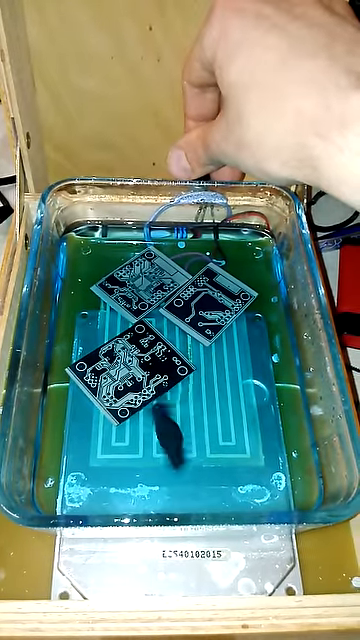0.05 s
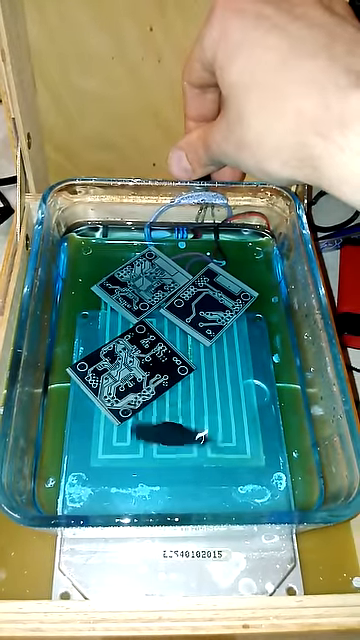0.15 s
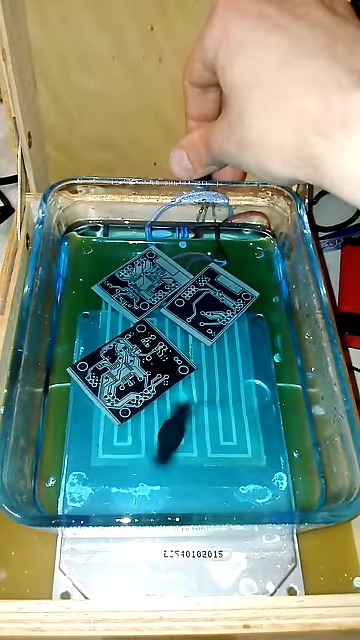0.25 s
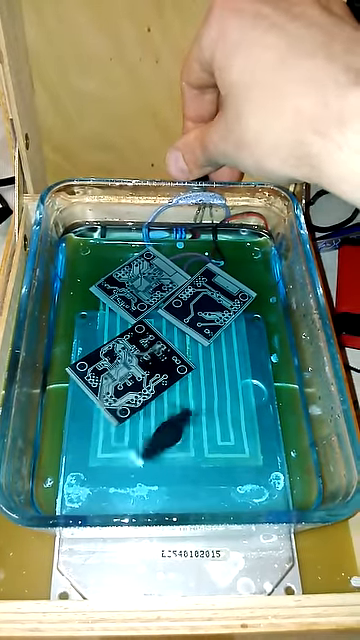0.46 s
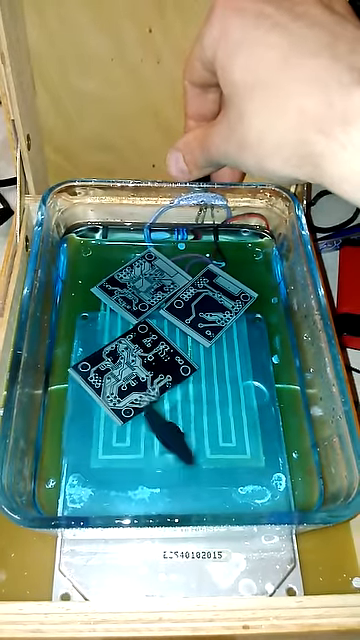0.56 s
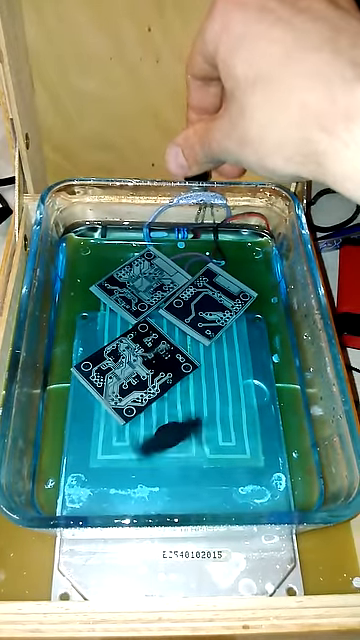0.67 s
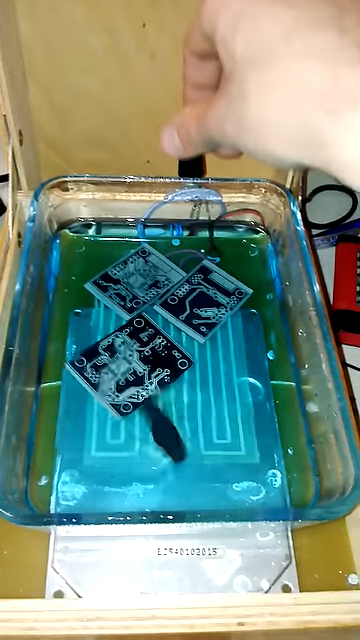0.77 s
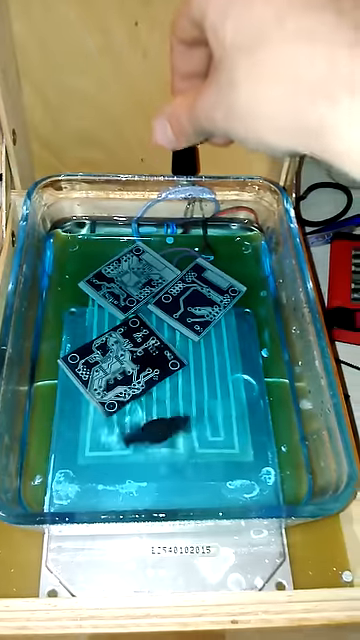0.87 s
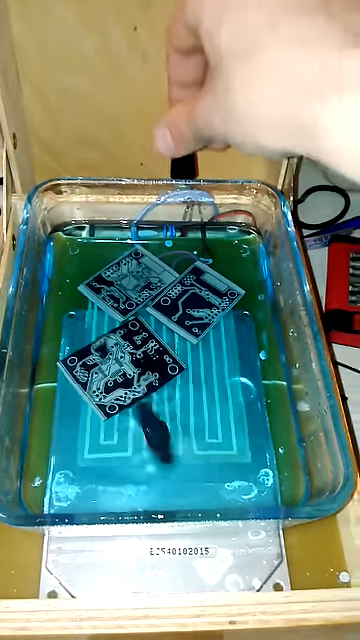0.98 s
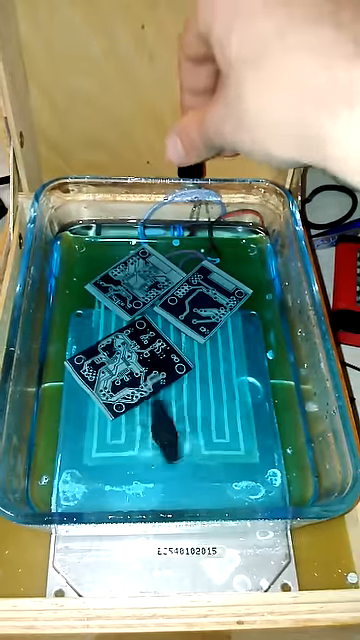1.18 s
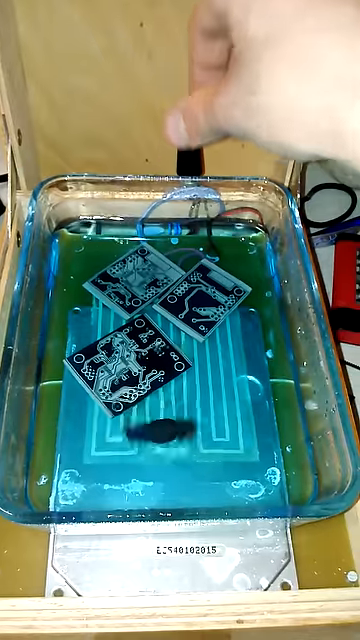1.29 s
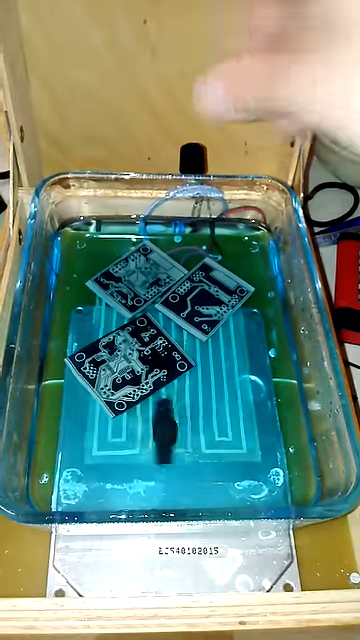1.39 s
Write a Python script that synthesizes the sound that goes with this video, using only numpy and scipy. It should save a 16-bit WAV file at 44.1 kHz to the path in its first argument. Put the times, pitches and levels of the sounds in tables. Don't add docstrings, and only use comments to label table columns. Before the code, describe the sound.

A small switch snaps sharply over and back, each click doubled, in a boxy wooden space.

```python
import sys
import numpy as np
from scipy import signal
from scipy.fft import rfft, irfft, next_fast_len
from scipy.io import wavfile
from scipy.ndimage import uniform_filter1d, map_coordinates

SR = 44100
rng = np.random.default_rng(int(sys.argv[2]) if len(sys.argv) > 2 else 0)


def volts_from_decibels(level):
    exponent = np.asarray(level, float) / 20
    return 10 ** exponent


def persist_wave(psi):
    counts = np.round(np.clip(psi, -1, 1) * 32767).astype(np.int16)
    wavfile.write(sys.argv[1], SR, np.atleast_2d(counts).T)


N = 63945
CLOCK = np.arange(N) / SR
T = np.arange(SR // 2) / SR

# (t/s, level/dB)
RUMBLE_COLOUR = [(8.8, -28), (15, 4), (43, 0.5), (91, -14.5), (100, -9), (130, -30), (220, -120)]
RUMBLE_DRIFT = [(0.0, -58.5), (0.204, -72), (0.226, -56), (0.346, -68), (0.642, -66), (0.782, -59),
                (0.896, -77), (0.976, -54), (1.054, -66), (1.45, -59)]
# (t/s, level/dB)
AIR_COLOUR = [(170, -40), (290, 1), (740, -5.5), (951, -3.5), (1350, -6), (3280, -9), (7830, -9),
              (10400, -9.5), (15800, -11)]
AIR_DRIFT = [(0.0, -62), (0.214, -61), (0.428, -60), (0.976, -60.5), (1.45, -60)]
# f/Hz, width/Hz, level/dB
FAN_MODES = [(205.5, 24, -69.5), (685, 83, -70.5), (1366, 89, -73.5), (2220, 37, -77), (9100, 330, -70.5),
             (10430, 310, -72)]
# t/s, level/dB
MOTOR_LOAD = [(0.0, -58.5), (0.096, -60), (0.14, -65), (0.184, -59.5), (0.286, -60), (0.318, -65),
              (0.346, -62.5), (0.528, -60.5), (0.548, -56.5), (0.694, -66), (0.738, -53.5), (0.77, -72.5),
              (0.81, -59), (0.868, -66.5), (0.936, -56), (1.0, -67), (1.024, -61), (1.45, -63)]
# f/Hz, width/Hz, level/dB
THUD_WOOD = [(396, 92, -2), (660, 13.3, 12.5), (740, 59, -4), (915, 83, 0), (1070, 260, -5.5),
             (1454, 24, 6), (1880, 47, -11.5), (2160, 110, -8)]
# f/Hz, level/dB, t60/s
BENCH_MODES = [(663, 2, 0.25), (737, 3, 0.18), (920, -11, 0.052), (406, -2, 0.076), (1460, -12, 0.071),
               (2140, -10, 0.059)]
# t/s, length/s, f/Hz, level/dB
RUB_EVENTS = [
    (0.424, 0.2, 1053, -64),
    (0.544, 0.11, 632, -66),
]
# t/s, level/dB, first f/Hz, last f/Hz
GLASS_TICKS = [
    (.472, -48, 2840, 2750),
    (.908, -49.5, 2880, 2550),
]
# delay/s, level/dB
WALL_ECHOES = [(.0045, -6.5), (.0076, -4.5), (0.0123, -12.5), (.0165, -48)]
# f/Hz, t60/s
BOX_DECAY = [(300, 0.7), (1000, 0.067), (3000, 0.29), (6000, 0.25), (10000, .22), (15000, 0.23)]
# f/Hz, level/dB, t60/s
PANEL_MODES = [(920.4, -2.5, 0.44), (887, -11, 0.35), (749.5, -9.5, .15), (1146, -14, .1)]
LID_MODES = [(623, -11.5, 0.19), (404.4, -16, 0.49), (320.4, -19.5, 0.52)]
# f/Hz, level/dB per Hz
THUMP_COLOUR = [(150, -23.5), (330, -5.5), (650, -5.5), (920, 0.5), (1400, -9.5), (2500, -28), (6000, -64)]
# f/Hz, level/dB per Hz
RATTLE_COLOUR = [(900, -25), (2700, -9.5), (5300, -8), (7000, -13.5), (8800, 2), (11200, 3), (13200, -11),
                 (16300, -25)]
# f/Hz, level/dB, t60/s
MODES_OVER = [(2675, -15, 0.023), (4940, -2.5, 0.0089), (5220, -5.5, 0.015), (7060, -6.5, 0.0064),
              (8990, 2, 0.0086), (10140, 6, 0.011), (10950, 1, 0.0085), (11600, -1, 0.0082),
              (14600, 1, 0.0045), (12450, -15, .006), (15600, -14, 0.0065), (3970, -18, 0.0063),
              (1371, -19, 0.027), (2190, -27.5, 0.041)]
MODES_BACK = [(2740, -15, 0.014), (5215, -1.5, 0.0087), (7120, -19, .008), (9376, -1.5, 0.014),
              (9840, -12, 0.0076), (10660, -3, 0.013), (11570, -3, 0.0077), (12450, -6, .009),
              (14600, -4, 0.0069), (1437, -20.5, 0.031), (2256, -22.5, 0.017), (1180, -20, 0.018),
              (15500, -23, .006), (3940, -11, 0.0079)]
# t/s, peak level/dB
SNAP_EVENTS = [
    (0.2155, -11),
    (0.2392, -13),
    (1.2345, -11),
    (1.2583, -13),
]
# tail level/dB, snap level/dB
THROW_TRIM = [
    (-1.5, 0.5),
    (1.6, 1.8),
]
# f/Hz, level/dB
SIDE_COLOUR = [(60, -44), (180, -36), (550, -45.5), (1650, -23.5), (4970, -26.5), (15000, -29)]
# from t/s, to t/s, low f/Hz, high f/Hz, level/dB
TREBLE_GAPS = [
    (.197, .2115, 2500, 7300, -30),
    (.197, .2115, 10600, 18000, -30),
    (.2055, .2115, 6500, 11400, -30),
    (1.2262, 1.2298, 5200, 11500, -18),
    (1.218, 1.224, 12500, 13500, -16),
]

ROOM_TOP_HZ, TOP_HZ = 15900, 16900
SNAP_DB, SNAP_RISE_S = -7.5, 0.0007
BOOM_RISE_S = 0.0022


def unit(x):
    return x / np.sqrt(np.mean(x ** 2) + 1e-20)


def along(points, hz):
    f, v = np.transpose(points)
    return np.interp(np.log(hz + 1), np.log(f + 1), v)


def curve(rows):
    return np.interp(CLOCK, *np.transpose(rows))


def wobble(rate):
    knots = rng.standard_normal(int(N * rate / SR) + 4)
    return map_coordinates(knots, [np.arange(N) * rate / SR])


def filtered(x, response):
    m = next_fast_len(len(x) + SR // 2)
    return irfft(rfft(x, m) * response(np.fft.rfftfreq(m, 1 / SR)), m)[:len(x)]


def below(x, top_hz):
    return filtered(x, lambda f: f < top_hz)


def peak(hz, width_hz):
    return lambda f: 1j * f * width_hz / (hz * hz - f * f + 1j * f * width_hz)


def narrow(hz, width_hz):
    return lambda f: peak(hz, width_hz)(f) ** 2


def hiss(response):
    return unit(filtered(rng.standard_normal(N), response))


def coloured(points):
    return hiss(lambda f: volts_from_decibels(along(points, f)))


def soft_start(rise_s):
    return 1 - np.exp(-(T / rise_s) ** 2)


def ring(modes, rise_s, scatter=1):
    total = 0
    for hz, db, t60 in modes:
        phase = hz * T + scatter * rng.random()
        total = total + volts_from_decibels(db - 60 * T / t60) * np.sin(2 * np.pi * phase)
    return soft_start(rise_s) * total


def add(track, s, sound):
    part = track[round(s * SR):][:len(sound)]
    part += sound[:len(part)]


def rumble():
    return volts_from_decibels(curve(RUMBLE_DRIFT)) * coloured(RUMBLE_COLOUR)


def air():
    swell = curve(AIR_DRIFT)
    return volts_from_decibels(-58 + swell - swell.mean() + 0.18 * wobble(7)) * coloured(AIR_COLOUR)


def fan():
    return sum(volts_from_decibels(db + 1.8 * wobble(5.34)) * hiss(peak(hz, width)) for hz, width, db in FAN_MODES)


def motor_hum():
    hum_hz, line_db, band_db, band_width_hz = 119.75, -61.5, -61.5, 39
    load = curve(MOTOR_LOAD)
    line = np.sqrt(2) * np.sin(2 * np.pi * np.cumsum(hum_hz + 2.45 * wobble(9.23)) / SR)
    band = hiss(narrow(hum_hz, band_width_hz))
    return volts_from_decibels(load - load.mean()) * (volts_from_decibels(line_db) * line + volts_from_decibels(band_db) * band)


def thud():
    out, rise_s, t60_s = np.zeros(N), 0.0059, 0.18

    def wood(f):
        return sum((-1) ** k * volts_from_decibels(db) * peak(hz, width)(f) for k, (hz, width, db) in enumerate(THUD_WOOD))

    knock = volts_from_decibels(-43 - 60 * T / t60_s) * (1 - np.exp(-T / rise_s)) * hiss(wood)[:len(T)]
    add(out, 0.693, knock + volts_from_decibels(-55.5) * ring(BENCH_MODES, rise_s))
    return out


def shuffle():
    out, stroke = np.zeros(N), np.hanning(round(0.14 * SR))
    add(out, 0.62, volts_from_decibels(-62) * stroke * hiss(narrow(805, 460))[:len(stroke)])
    return out


def rubs():
    out = np.zeros(N)
    for s, length_s, hz, db in RUB_EVENTS:
        stroke = np.hanning(round(length_s * SR)) ** 0.5
        add(out, s, volts_from_decibels(db) * stroke * hiss(peak(hz, width_hz=12))[:len(stroke)])
    return out


def glass_ticks():
    out, u = np.zeros(N), np.linspace(0, 1, round(0.0057 * SR))
    for s, db, first_hz, last_hz in GLASS_TICKS:
        hz = first_hz + (last_hz - first_hz) * u
        add(out, s, volts_from_decibels(db) * np.sin(np.pi * u ** 0.43) * np.sin(2 * np.pi * np.cumsum(hz) / SR))
    return out


def box_tail(x):
    hz, t, z = signal.stft(rng.standard_normal(SR // 2), SR, nperseg=256)
    decay = volts_from_decibels(-60 * t / along(BOX_DECAY, hz)[:, None])
    tail = signal.istft(z * decay, SR, nperseg=256)[1]
    return signal.fftconvolve(x, tail / np.linalg.norm(tail))[:len(x)]


def panel_boom():
    hold_s, damp_t60_s = 0.033, 0.018
    damping = volts_from_decibels(-15.5 - 60 * np.maximum(T - hold_s, 0) / damp_t60_s)
    return damping * ring(PANEL_MODES, BOOM_RISE_S, scatter=0)


def thump():
    rise_s, t60_s = 0.0049, 0.25
    return coloured(THUMP_COLOUR)[:len(T)] * volts_from_decibels(-25 - 60 * T / t60_s) * (1 - np.exp(-T / rise_s))


def rattle():
    t60_s = 0.012
    return coloured(RATTLE_COLOUR)[:len(T)] * volts_from_decibels(-60 * T / t60_s) * soft_start(SNAP_RISE_S)


def snap_in_box(modes, tail_db, snap_db):
    ringing = ring(modes, SNAP_RISE_S, scatter=0)
    direct = ringing + rattle()
    impulse = 1.0 * (np.arange(len(T)) == 40)
    click = filtered(impulse, lambda f: volts_from_decibels(along(RATTLE_COLOUR, f)))
    room = volts_from_decibels(13 + tail_db) * box_tail(click + volts_from_decibels(-24) * ringing)
    for delay_s, db in WALL_ECHOES:
        add(room, delay_s, volts_from_decibels(db) * (rattle() + volts_from_decibels(-8) * ring(modes, SNAP_RISE_S)))
    return volts_from_decibels(snap_db) * direct + below(room, ROOM_TOP_HZ)


def switch():
    out = np.zeros(N)
    pairs = SNAP_EVENTS[:2], SNAP_EVENTS[2:]
    for pair, modes, (tail_db, snap_db) in zip(pairs, (MODES_OVER, MODES_BACK), THROW_TRIM):
        sound = snap_in_box(modes, tail_db, snap_db)
        first_s, first_db = pair[0]
        add(out, first_s + 0.0105, volts_from_decibels(first_db + SNAP_DB) * panel_boom())
        add(sound, 0.008, volts_from_decibels(-16.5) * ring(LID_MODES, BOOM_RISE_S))
        for s, db in pair:
            add(out, s + 0.0002, volts_from_decibels(db + SNAP_DB) * (sound + thump()))
    return out


def scene():
    snaps = switch()
    small_sounds = glass_ticks() + rubs() + shuffle() + thud()
    background = motor_hum() + fan() + air() + rumble()
    mid = snaps + below(small_sounds + background, ROOM_TOP_HZ)
    side = filtered(mid, lambda f: volts_from_decibels(along(SIDE_COLOUR, f)) * np.exp(2j * np.pi * f * 0.0003))
    return np.array([mid + side, mid - side])


def roll_off(x):
    return signal.sosfilt(signal.butter(12, 16990, fs=SR, output="sos"), x)


def record(dry):
    out = np.array([below(channel, TOP_HZ) for channel in dry])
    for from_s, to_s, low_hz, high_hz, db in TREBLE_GAPS:
        shut = uniform_filter1d(((CLOCK > from_s) & (CLOCK < to_s)) * (1 - volts_from_decibels(db)), size=60)

        def band(f):
            return np.clip(np.minimum(f - low_hz, high_hz - f) / 700 + 1, 0, 1)

        out = out - shut * np.array([filtered(channel, band) for channel in out])
    return roll_off(out)


dry = scene()
out = record(dry)
persist_wave(out)
```